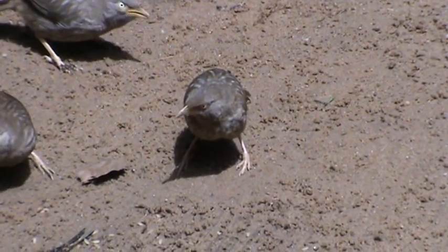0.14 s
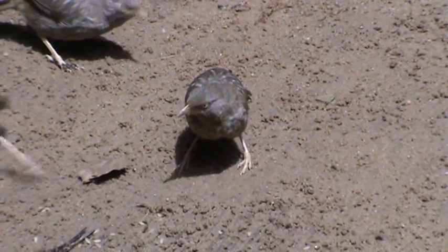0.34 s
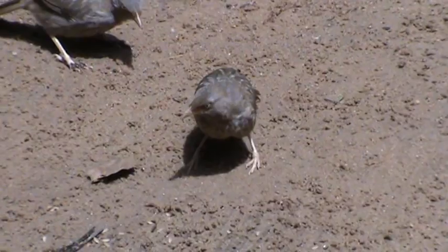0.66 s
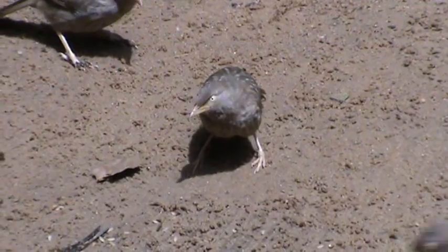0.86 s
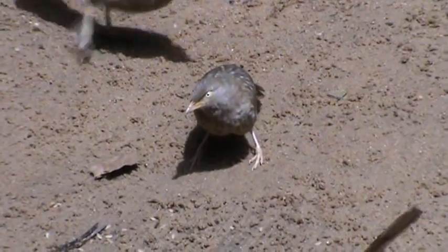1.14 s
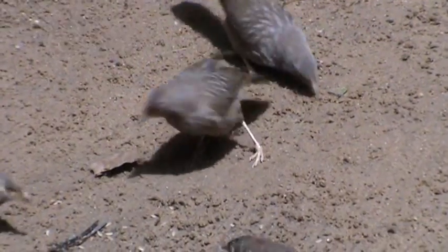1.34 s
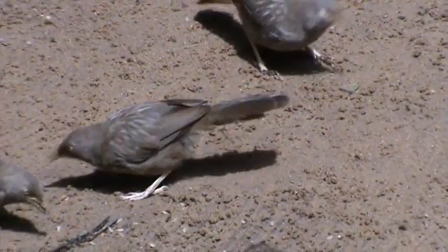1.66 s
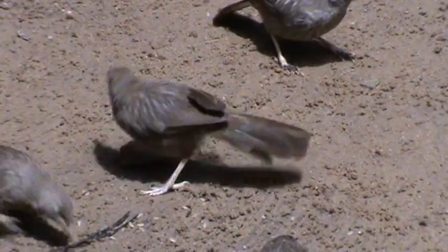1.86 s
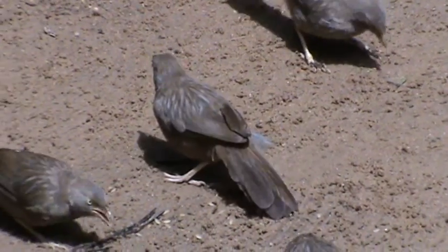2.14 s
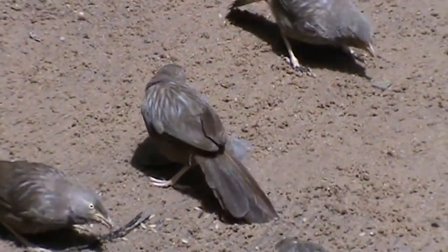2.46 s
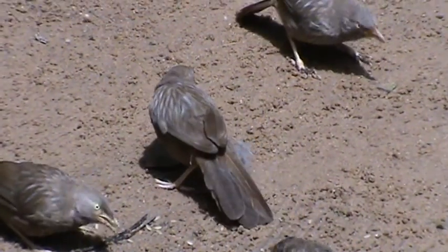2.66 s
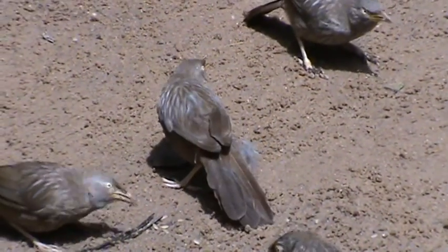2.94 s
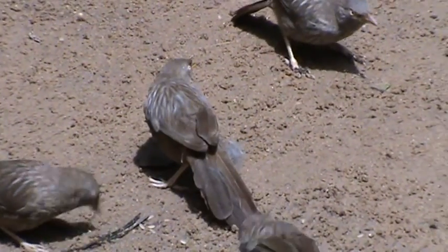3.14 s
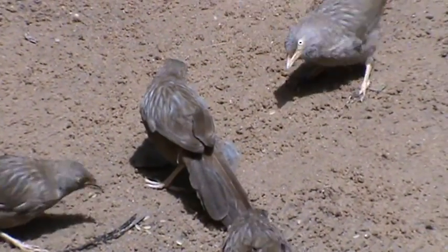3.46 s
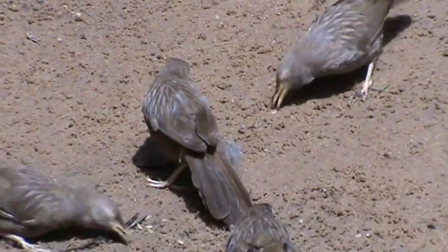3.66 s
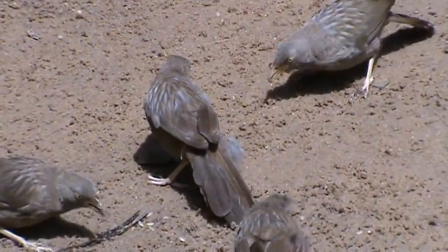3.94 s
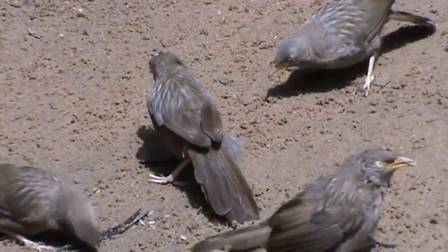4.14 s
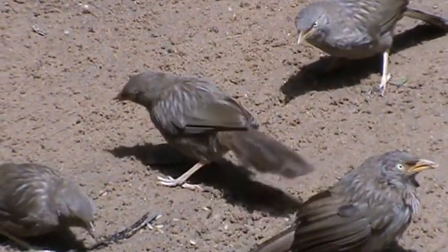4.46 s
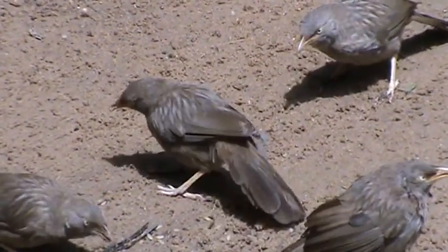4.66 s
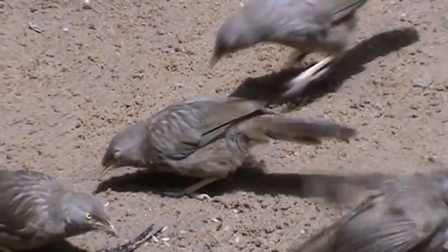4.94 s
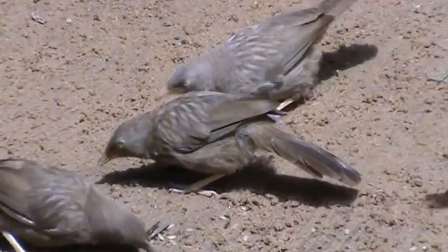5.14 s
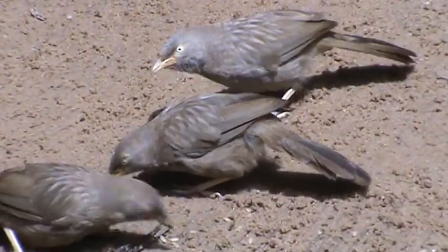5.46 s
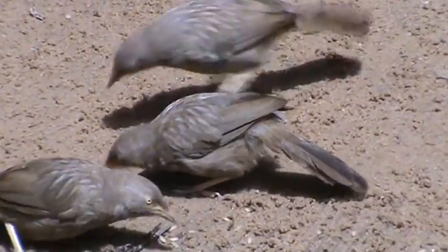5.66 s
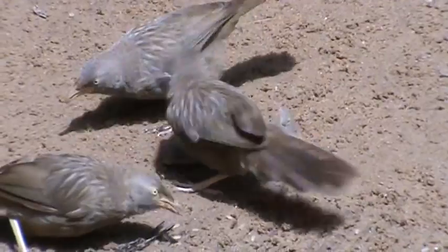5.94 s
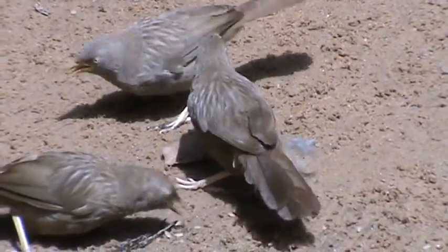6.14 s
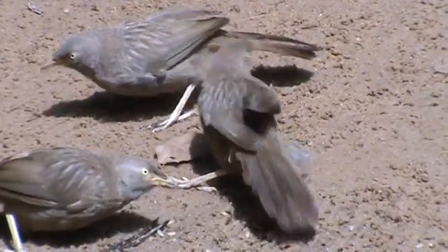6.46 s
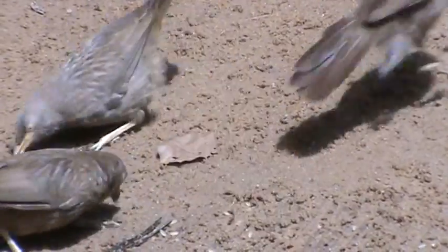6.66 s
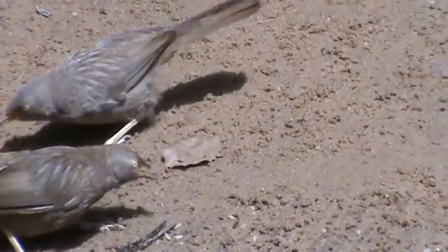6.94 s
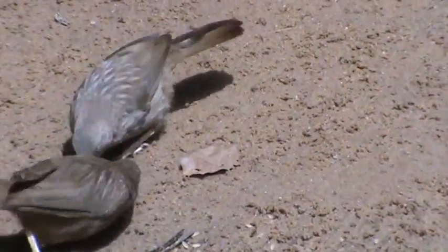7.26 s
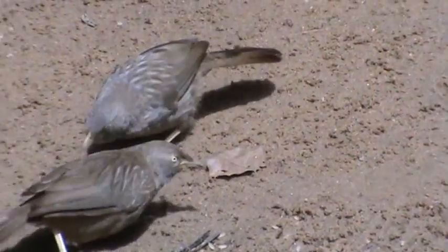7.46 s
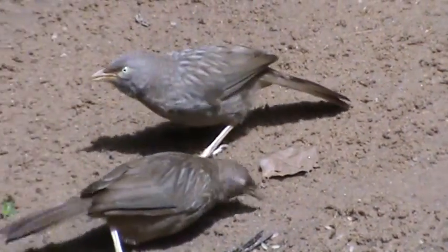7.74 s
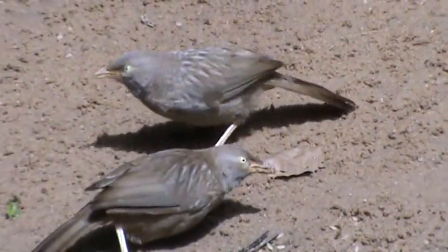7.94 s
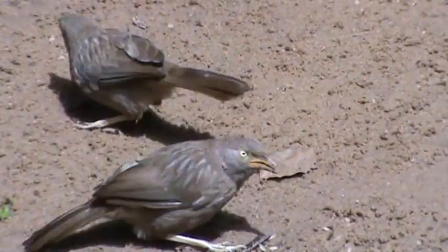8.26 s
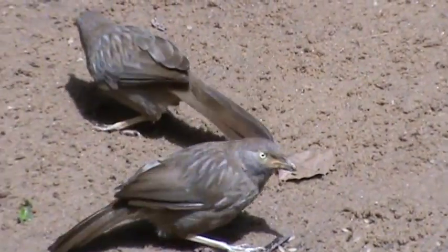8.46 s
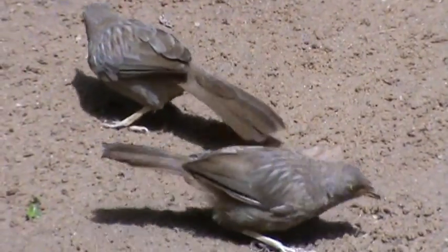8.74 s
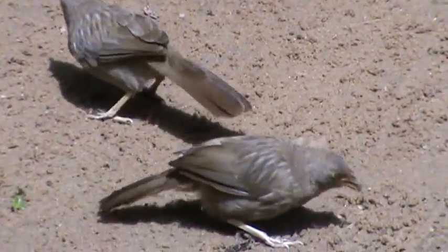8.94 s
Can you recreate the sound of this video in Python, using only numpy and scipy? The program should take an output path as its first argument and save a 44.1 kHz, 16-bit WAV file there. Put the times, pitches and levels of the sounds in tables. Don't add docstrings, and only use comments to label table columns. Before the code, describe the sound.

Outdoors in a bare yard, babblers squabble close to a small stereo microphone. A low, uneven machine hum is strongest at the start and slowly recedes under distant air, hiss and a very faint high electronic whine. From 0 to 1.3 seconds come hoarse rasps, falling squawks and quick chatter, topped by loud shrill squeals around 1 second. A low grumble and chuck at 1.8 lead to yelps and shrieks until 2.7. Faint mutters and rasps follow, building from 3.4. At 4.7 a sharp shriek starts a second quarrel of chatter and arching yelps, peaking in a trembling scream near 5.6 and a long rasp at 5.9. Wings rustle throughout and beaks tick on grit. Grumbles and chucks thin out after 6. From 7.5 a distant songbird whistles four echoing phrases, each ending in a falling sweep. Three rapid hollow knocks near 8.95 precede a final loud rasp.

```python
import sys
import numpy as np
from scipy import signal
from scipy.fft import rfft, irfft, next_fast_len
from scipy.io import wavfile
from scipy.ndimage import uniform_filter1d

SR = 44100
rng = np.random.default_rng(int(sys.argv[2]) if len(sys.argv) > 2 else 0)


def master(y):
    cut = np.clip(np.atleast_2d(y).T, -1, 1)
    pcm = np.round(cut * 32767)
    wavfile.write(sys.argv[1], SR, pcm.astype(np.int16))


def boost(x):
    u = np.asarray(x, float) / 20
    return 10 ** u


N = 401751
T = np.arange(N) / SR
LEAD_S = .005


def curve(points, hz):
    point_hz, value = np.transpose(points)
    return np.interp(np.log(hz + 1), np.log(point_hz), value)


def fades(n, edge_s):
    t = np.arange(n) / SR
    nearest_end_s = np.minimum(t, t[::-1])
    return np.sin(np.pi / 2 * np.clip(nearest_end_s / edge_s, 0, 1)) ** 2


def add(out, x, s, pan_db):
    i = int(s * SR)
    x = x[:N - i]
    out[:, i:i + len(x)] += x * boost(np.array([[pan_db], [-pan_db]]) / 2)


def band(x, lo_hz, hi_hz):
    sos = signal.butter(2, [lo_hz, min(hi_hz, .45 * SR)], "bandpass", fs=SR, output="sos")
    return signal.sosfilt(sos, x)


def walk(rate, n):
    k = max(int(SR / rate), 1)
    levels = rng.standard_normal(n // k + 2)
    joined = np.interp(np.arange(n) / k, np.arange(n // k + 2), levels)
    return uniform_filter1d(joined, k)


def echo(x, t60_s, direct_db, wet_db, damp_hz, gap_s):
    t = np.arange(int(1.2 * SR)) / SR
    shared, left, right = rng.standard_normal((3, len(t)))
    tail = .35 * shared + np.array([left, right])
    tail = tail * boost(-60 * t / t60_s) * np.clip(t / gap_s, 0, 1)
    tail = signal.lfilter(*signal.butter(1, damp_hz, fs=SR), tail)
    tail = tail / np.sqrt(np.sum(tail ** 2, axis=1, keepdims=True))
    wet = signal.fftconvolve(x, tail, axes=1)[:, :N]
    return boost(direct_db) * x + boost(wet_db) * wet


# frequency in Hz, level in dB.
THROAT = [(500, -30), (1000, -17), (1400, -13), (1900, -2), (2400, 0), (3000, -5), (4000, -2), (4800, -6),
          (6000, -14), (8000, -22), (11000, -26), (16000, -38)]


def throat_gain(f, tilt_db, beak):
    peaks_db = sum(db / (1 + ((f - hz) / 400) ** 2) for hz, db in beak)
    slope_db = tilt_db * np.log2(f / 2500)
    return boost(curve(THROAT, f) + slope_db + peaks_db) * (f < 16000)


# start in seconds, end in seconds, beats per second in Hz, depth from 0 to 1.
FLUTTERS = [
    (1.0, 1.06, 170, .35),
    (1.18, 1.24, 150, .45),
    (1.24, 1.32, 150, .25),
    (5.57, 5.64, 230, .3),
    (5.64, 5.84, 250, .5),
]


def flutter(t):
    out = 0
    for start, end, rate, depth in FLUTTERS:
        turns = np.cumsum(rate * (1 + .2 * walk(40, len(t)))) / SR
        out = out + depth * ((t > start) & (t < end)) * np.sin(2 * np.pi * turns)
    return out


def squawk(pitch, effort, hoarse, tilt_db, beak, rasp_db):
    first = int(max(pitch[0][0] - LEAD_S, 0) * SR)
    t = np.arange(first, int((pitch[-1][0] + .01) * SR)) / SR
    hz = np.interp(t, *np.transpose(pitch))
    db = np.interp(t, *np.transpose(effort))
    hz = uniform_filter1d(hz, size=400, mode="nearest")
    wobble = (.005 + .025 * hoarse) * walk(60, len(t))
    cycles = np.cumsum(hz * (1 + wobble)) / SR
    k = np.arange(1, int(16000 / hz.min()) + 1)[:, None]

    per_cycle = rng.standard_normal((len(k), int(cycles[-1]) + 2))
    size = 1.2 * np.array([np.interp(cycles, np.arange(len(c)), c) for c in per_cycle])
    f = k * hz[::16]
    steps = f.shape[1]

    def wide(v):
        return np.repeat(v, 16, axis=1)[:, :len(t)]

    tremble_db = 2.5 * np.array([walk(50 * 16, steps) for _ in k])
    blur = wide(1.5 * np.array([walk(420 * 16, steps) for _ in k]))

    tiring = np.linspace(.45, 1.55, steps)
    share = wide(np.clip(hoarse * tiring * (f / 2500) ** .7, 0, 1))
    grain = min(2 * hoarse, 1)
    rough = np.sqrt(1 - grain) * blur + np.sqrt(grain) * size
    voiced = np.sqrt(1 - share) + np.sqrt(share) * rough
    top = min(4 * hoarse, .9)
    rasp = np.sqrt(1 - top) + np.sqrt(top / 2) * (size + blur)

    slip_s = (6e-6 + 3e-5 * hoarse) * walk(900, len(t))
    second = flutter(t)
    cycles = cycles + hz * slip_s + .08 * second

    gain = throat_gain(f, tilt_db, beak)
    high = np.clip((f - 4900) / 1100, 0, 1) ** 2

    def steady(g):
        return wide(g * boost(tremble_db) / np.sqrt(np.sum(g ** 2, axis=0) / 2))

    low_part = steady(gain * (1 - high))
    high_part = steady(gain * (high + 1e-6))
    partials = voiced * low_part + boost(rasp_db) * rasp * high_part
    tone = np.sum(partials * np.cos(k * 2 * np.pi * cycles + k ** 2), axis=0)
    return boost(db - 2.5) * (1 + second) * tone * fades(len(t), .017)


def effort_of(s, length, db, attack_s, swell_db, release_s):
    end_db = db + swell_db / 2
    return [(s, db - 9), (s + attack_s, db - swell_db / 2),
            (s + length - release_s, end_db), (s + length, end_db - 3.5)]


def contour(s, length, db, first_hz, last_hz, bend, scoop, **level):
    t = np.arange(0, length, .004)
    glide_hz = first_hz + (last_hz - first_hz) * (t / length) ** bend
    hz = glide_hz * (1 - scoop * np.exp(-t / .0153))
    return np.transpose([s + t, hz]), effort_of(s, length, db, **level)


# start in seconds, length in seconds, level in dB, first pitch in Hz, last pitch in Hz.
SQUEALS = [
    (.956, .085, -29.5, 2274, 1987),
    (6.175, 0.088, -49.5, 2454, 2510),
]
MUTTERS = [
    (2.935, 0.12, -60, 558, 545),
    (4.285, 0.11, -42.5, 579, 580.5),
    (7.27, 0.21, -45, 457, 462.3),
]
GRUMBLES = [
    (1.762, 0.145, -42.5, 389.4, 417.4),
    (4.487, 0.11, -41.5, 557, 575),
]
CHUCKS = [
    (1.96, 0.099, -37.5, 1255, 1055),
    (6.48, .095, -35, 1243, 1157),
]
RASPS = [
    (0.0, 0.11, -46, 879, 910),
    (.303, 0.088, -38.5, 740, 674),
    (5.86, 0.22, -37.5, 793.6, 769),
    (6.86, .25, -47, 542, 557),
    (7.27, 0.24, -48.5, 786, 801),
    (7.82, 0.2, -46.5, 1081, 951),
]
# (time in seconds, pitch in Hz).
QUARREL = [("slide", -33.5, 4.8, [(3000, 12.5), (4100, 4.9)], [(.1, 1124), (.12, 1051), (.2, 988),
           (.235, 882), (.285, 748)]), ("slide", -34, 0, [(2600, 8), (3600, 9.4), (2000, -3)],
           [(.392, 1142), (.41, 1051), (.435, 903), (.47, 820)]), ("chatter", -33, 1, [(3300, 7.5),
           (3900, 12), (2600, -1)], [(.47, 662), (.51, 634.5), (.56, 652), (.635, 619)]),
           ("whine", -37, -5, [(4700, 21), (5250, 23)], [(.675, 521), (.77, 520)]),
           ("rasp", -35, 0, [(2000, 2.2), (6500, 3.3)], [(.66, 638), (.77, 653.5)]),
           ("chatter", -32.5, 1, [(3250, 8.5), (3850, 10.8)], [(.762, 751), (.79, 670), (.825, 626),
           (.87, 654.5), (.92, 621.6), (.955, 666)]), ("squeal", -33, -5.5, [(2250, 1.5), (4300, 5),
           (5000, -7)], [(1.13, 2186), (1.165, 2296), (1.2, 2180), (1.24, 2146), (1.27, 1930),
           (1.308, 1563)]), ("shriek", -38, 1, [(4800, 12), (3400, 4.8), (6800, 8)], [(2.05, 675),
           (2.13, 678)]), ("yelp", -38, 0, [(3600, 3), (4700, 4.4), (6000, 9.6)], [(2.12, 1513),
           (2.14, 1952), (2.165, 1987), (2.195, 1743), (2.225, 1226)]),
           ("shriek", -35.5, -0.52, [(2460, 5.1), (4530, 14.5), (3400, -1)], [(2.336, 1261),
           (2.37, 1154), (2.4, 949), (2.45, 768), (2.505, 681)]), ("shriek", -39, 0, [(2400, 3.5),
           (4620, 6), (3500, 0)], [(2.576, 810), (2.613, 806), (2.64, 663), (2.67, 638)]),
           ("mutter", -39, -3, [(2450, 9.8), (4500, 11)], [(2.645, 859), (2.68, 810), (2.725, 739)]),
           ("rasp", -45.5, -4, [(1850, 8.7), (4200, 6)], [(3.425, 612), (3.545, 608)]),
    ("rasp", -43, 1.8, [(2300, 5.6), (5000, 5.6)], [(3.55, 572.4), (3.65, 585), (3.76, 575)]),
    ("rasp", -36, 0, [(1950, 3.4), (5700, 8.2)], [(9.012, 956), (9.11, 1006)]),
    ("whine", -42.5, 3.6, [(2100, 4), (4400, 13)], [(3.828, 1558), (3.86, 1450), (3.89, 1146), (3.92, 872), (3.945, 728)]),
    ("mutter", -40.5, 0, [(2250, 3.5), (1430, 4.2)], [(4.02, 729), (4.07, 720), (4.1, 641), (4.13, 636)]),
    ("chatter", -35.5, -2.8, [(2350, 10.5), (3600, 11)], [(4.125, 590), (4.18, 586)]),
           ("shriek", -29.5, -6.5, [(3200, 4.1), (4800, 8.5)], [(4.682, 1690), (4.695, 1560), (4.722, 1450)]),
    ("slide", -39, -2, [(2400, 6), (3200, 3)], [(4.712, 1262), (4.735, 1102), (4.762, 803)]),
    ("chatter", -35.5, 2.7, [(2500, 4.4), (3800, 9.2), (4500, 7.9)], [(4.752, 806), (4.778, 675), (4.8, 609), (4.835, 632), (4.885, 612)]),
    ("yelp", -35, 0, [(3800, 9.5), (2500, 7.7), (4870, -5)], [(4.878, 1634), (4.915, 2018), (4.95, 1917), (4.985, 1706), (5.012, 1200)]),
    ("chatter", -35, 0.5, [(2350, 3.9), (3500, 8)], [(5.13, 884), (5.146, 795), (5.165, 716), (5.2, 638)]),
    ("chatter", -33.5, 0.9, [(3300, 8.4), (2590, 2.1)], [(5.203, 661), (5.22, 681), (5.255, 651), (5.305, 641)]),
    ("yelp", -32.5, -3.5, [(3900, 7.5), (2000, 2), (5170, -6)], [(5.298, 1772), (5.325, 2160), (5.355, 1993), (5.38, 1798), (5.402, 1374)]),
    ("grumble", -39, 8.2, [(2900, 9), (5500, 4)], [(6.25, 434.4), (6.35, 447.7), (6.42, 453)]),
    ("chuck", -37.5, -2.4, [(3400, 10), (6400, 4.6)], [(6.655, 900), (6.69, 860), (6.735, 836)]),
]
# time in seconds, pitch in Hz.
SCREAM_HZ = [(5.524, 1955), (5.599, 1870), (5.625, 1895), (5.651, 1970.5), (5.721, 1910.5), (5.801, 1534),
             (5.812, 1329), (5.827, 1105)]
# time in seconds, level in dB.
SCREAM_DB = [(5.525, -34), (5.562, -31), (5.62, -34), (5.665, -27), (5.74, -31), (5.8, -31), (5.826, -29.5)]
# resonance in Hz, strength in dB.
SCREAM_BEAK = [(3850, 6.5), (4750, -7), (7000, 8)]
VOICE = {"squeal": dict(pan_db=0.3, beak_hz=4500, beak_db=1.5, tilt_db=-1.5, rasp_db=-20),
         "yelp": dict(pan_db=-1.5, beak_hz=3800, beak_db=4.5, tilt_db=-0.2, rasp_db=-17.5),
         "slide": dict(pan_db=-3, beak_hz=3070, beak_db=10, tilt_db=-4, rasp_db=-15),
         "chatter": dict(pan_db=-2, beak_hz=3570, beak_db=9, tilt_db=-4.1, rasp_db=-16.5),
         "mutter": dict(pan_db=-1, beak_hz=2100, beak_db=10, tilt_db=-6, rasp_db=-14),
         "shriek": dict(pan_db=-1.5, beak_hz=4830, beak_db=12, tilt_db=-4.5, rasp_db=-10.5),
         "grumble": dict(pan_db=4, beak_hz=3080, beak_db=3, tilt_db=-7, rasp_db=-17),
         "whine": dict(pan_db=-2, beak_hz=1450, beak_db=0, tilt_db=-10, rasp_db=-12),
         "chuck": dict(pan_db=4.5, beak_hz=3300, beak_db=5, tilt_db=-7.5, rasp_db=-17.5),
         "rasp": dict(pan_db=1.2, beak_hz=2100, beak_db=0, tilt_db=-3, rasp_db=-10.5),
         "scream": dict(pan_db=-3, beak_hz=3850, beak_db=5, tilt_db=0.5, rasp_db=-18)}
HOARSENESS = dict(squeal=.12, yelp=.25, slide=.36, whine=.24, chatter=.25, mutter=.38, shriek=.3, grumble=.47, chuck=.4, rasp=.8, scream=.09)
SHAPE = {"squeal": dict(bend=2.9, scoop=0.055, attack_s=0.0033, swell_db=0, release_s=0.025),
         "yelp": dict(bend=1.9, scoop=.2, attack_s=.018, swell_db=1.5, release_s=.02),
         "slide": dict(bend=1.7, scoop=0.0092, attack_s=0.0046, swell_db=6, release_s=0.0067),
         "chatter": dict(bend=0.336, scoop=0.013, attack_s=0.013, swell_db=0.7, release_s=0.013),
         "mutter": dict(bend=1, scoop=0.0028, attack_s=0.027, swell_db=-1.5, release_s=0.01),
         "shriek": dict(bend=0.96, scoop=0.012, attack_s=0.0094, swell_db=0.5, release_s=0.039),
         "grumble": dict(bend=1.066, scoop=0.015, attack_s=0.003, swell_db=6, release_s=0.042),
         "whine": dict(bend=1.3, scoop=0.0093, attack_s=0.0069, swell_db=5, release_s=0.022),
         "chuck": dict(bend=1.17, scoop=0.0089, attack_s=0.017, swell_db=-1, release_s=0.02),
         "rasp": dict(bend=1.6, scoop=0.0079, attack_s=0.028, swell_db=-6.5, release_s=0.035)}


def flock():
    out = np.zeros((2, N))
    notes = []
    kinds = dict(squeal=SQUEALS, mutter=MUTTERS, grumble=GRUMBLES, chuck=CHUCKS, rasp=RASPS)
    for kind, rows in kinds.items():
        for row in rows:
            pitch, effort = contour(*row, **SHAPE[kind])
            notes.append((kind, None, pitch, effort))
    for kind, db, swell_db, beak, pitch in QUARREL:
        start, end = pitch[0][0], pitch[-1][0]
        shape = SHAPE[kind]
        effort = effort_of(start, end - start, db, shape["attack_s"], swell_db, shape["release_s"])
        notes.append((kind, beak, pitch, effort))
    notes.append(("scream", SCREAM_BEAK, SCREAM_HZ, SCREAM_DB))

    for kind, beak, pitch, effort in notes:
        voice = VOICE[kind]
        if beak is None:
            hz, db = voice["beak_hz"], voice["beak_db"]
            beak = [(hz, db), (1.9 * hz, .6 * db)]
        note = squawk(pitch, effort, HOARSENESS[kind], voice["tilt_db"], beak, voice["rasp_db"])
        add(out, note, max(pitch[0][0] - LEAD_S, 0), voice["pan_db"])
    return out


# start in seconds,
# length in seconds, middle frequency in Hz, level in dB.
RUSTLES = [(0.0, .04, 2900, -37), (.5, .2, 1500, -48), (.67, .12, 9000, -51), (.798, .21, 810, -41.5),
           (1.0, .16, 5500, -49), (1.0, .16, 3000, -47), (1.24, .3, 6000, -53), (1.97, .1, 2500, -45),
           (2.22, .14, 5000, -49), (2.22, .14, 2300, -48), (2.48, .13, 5500, -53), (2.02, .26, 9260, -51),
           (2.17, .12, 4700, -43), (2.34, .17, 4400, -43), (2.6, .14, 6460, -51), (3.15, .17, 4200, -53),
           (3.425, .07, 4300, -50), (3.43, .08, 860, -43), (3.614, .12, 6000, -49), (4.04, .1, 3500, -48),
           (4.29, .12, 3300, -49), (4.53, .07, 2500, -46), (4.679, .096, 900, -38.5),
           (4.68, .055, 5000, -39), (4.78, .12, 5170, -43), (4.85, .05, 2700, -42), (4.95, .1, 3800, -44),
           (5.0, .11, 4000, -51.5), (5.2, .11, 5200, -41), (5.18, .14, 10000, -52), (5.37, .13, 3900, -43),
           (5.75, .12, 9500, -51), (5.85, .17, 940, -40), (5.86, .12, 5500, -45), (5.95, .14, 5500, -50),
           (.26, .14, 6000, -52), (.6, .09, 5500, -50), (6.06, .2, 1950, -49.5), (6.279, .19, 806, -47.5),
           (6.365, .055, 3000, -42), (6.53, .06, 2200, -45), (6.67, .08, 2200, -45),
           (6.55, .2, 4900, -48.5), (7.082, .19, 1800, -61), (7.457, .18, 2400, -47),
           (7.81, .12, 2100, -48), (7.87, .12, 9000, -63), (8.502, .064, 9000, -55),
           (9.007, .08, 6000, -50)]


def rustles():
    out = np.zeros((2, N))
    for s, length, hz, db in RUSTLES:
        n = int(length * SR)
        grains = rng.standard_normal(n) * boost(2 * walk(144, n))
        brush = band(grains, 0.67 * hz, 1.22 * hz) * np.hanning(n)
        add(out, boost(db + 8.5) * brush, s, .8)
    return out


# time in seconds, nearness in dB.
MACHINE_DB = [(0.0, 10.5), (1.6, 4.5), (3.6, 2), (5.0, 2), (9.11, -4)]
# frequency in Hz, level in dB.
HUM = [(48.4, -51.5), (70.0, -65), (134.6, -68), (199.2, -63.5)]


def hum():
    near_db = np.interp(T, *np.transpose(MACHINE_DB))
    out = 0
    for hz, db in HUM:
        share = .33 if hz < 60 else 1
        phase = 2 * np.pi * np.cumsum(hz * (1 + 0.0454 * walk(hz / 8, N))) / SR
        level_db = db + share * near_db + (hz - 30) / 35 * walk(hz / 7, N)
        out = out + np.sqrt(2) * boost(level_db) * np.sin(phase)
    return out


# frequency in Hz, level in dB per Hz.
AIR = [(35, -12), (60, -3), (107, -8), (211, -11.5), (369, -15), (646, -15), (726, -15.5), (938, -16),
       (2070, -17.5), (2440, -19), (3880, -22.5), (15700, -35)]
# frequency in Hz, left-right likeness from 0 to 1.
LIKENESS = [(60, .9997), (130, .99), (300, .88), (700, .6), (3000, .35), (8000, .35), (12000, .8)]


def air():
    size = next_fast_len(N)
    hz = np.fft.rfftfreq(size, 1 / SR)
    like = curve(LIKENESS, hz)
    mid, side = rfft(rng.standard_normal((2, size))) * boost(curve(AIR, hz))
    mid = mid * np.sqrt(1 + like)
    side = side * np.sqrt(1 - like)
    scale = np.sqrt(np.mean(irfft(mid * (hz > 300), size) ** 2))
    both = np.array([mid + side, mid - side])
    bass = 1 / (1 + (hz / 350) ** 2)
    rumble = irfft(bass * both, size)[:, :N]
    hiss = irfft((1 - bass) * both, size)[:, :N]
    fade_db = 0.49 * np.interp(T, *np.transpose(MACHINE_DB))
    gust_db = .7 * walk(1.5, N)
    return boost(-53) * (boost(fade_db) * rumble + boost(gust_db) * hiss) / scale


def electronic_whine():
    return boost(-77) * np.sin(2 * np.pi * 15625 * T)


# time in seconds, peak level in dB, ringing frequency in Hz.
TICKS = [(1.9382, -34, 7280), (2.9544, -38, 4130), (4.098, -30, 6000), (7.121, -39, 3500),
         (7.362, -46, 5000), (4.6844, -50, 4840), (8.0481, -39, 4320), (8.5494, -49, 5500),
         (8.6681, -35, 4320)]


def beak_taps():
    out = np.zeros((2, N))
    t = np.arange(2000) / SR
    for s, db, hz in TICKS:
        burst = rng.standard_normal(len(t)) * np.exp(-t / 0.00075)
        add(out, boost(db) * band(burst, .5 * hz, 2.0 * hz), s, 1.5)
    return out


# start in seconds after the phrase's time, length in seconds,
# first pitch in Hz, last pitch in Hz, level in dB.
PHRASE = [
    (-.072, 0.0403, 2344, 2038, -50.5),
    (-.034, 0.0347, 2100, 2630, -51.5),
    (-.004, 0.033, 3090, 3032, -42),
    (0.104, .028, 5404, 5490, -46.5),
    (0.133, .068, 5400, 3173, -40),
]
# time in seconds, added level in dB.
PHRASES = [
    (7.575, -3.5),
    (8.0, -0.7),
    (8.388, -1),
    (8.805, -1.2),
]
# start in seconds, length in seconds, first pitch in Hz, last pitch in Hz, level in dB.
WHISTLES = [
    (7.455, 0.055, 2720, 2690, -53),
]


def songbird():
    out = np.zeros((2, N))
    song = [(s + after, length, start_hz, end_hz, db + more_db)
            for s, more_db in PHRASES
            for after, length, start_hz, end_hz, db in PHRASE]
    for s, length, start_hz, end_hz, db in song + WHISTLES:
        n = int(length * SR)
        scooped = 2800 < start_hz < 3200
        scoop = 0.137 * np.exp(-np.arange(n) / SR / 0.00645) * scooped
        hz = np.geomspace(start_hz, end_hz, n) * (1 - scoop + 0.0088 * walk(99, n))
        whistle = np.sin(2 * np.pi * np.cumsum(hz) / SR) * fades(n, 0.0073)
        add(out, boost(db + 0.43 * walk(78, n)) * whistle, s, 4.5)
    return out


# time in seconds, level in dB, ringing frequency in Hz.
KNOCKS = [
    (8.947, -44, 466),
    (8.974, -40.5, 472),
    (8.992, -38, 507),
]


def knocks():
    out = np.zeros((2, N))
    t = np.arange(2000) / SR
    for s, db, hz in KNOCKS:
        ring = np.sin(2 * np.pi * hz * t) * np.exp(-t / 0.01)
        crack = 4.2 * band(rng.standard_normal(len(t)) * np.exp(-t / 0.0088), 470, 1800)
        add(out, boost(db - 2) * (ring + crack), s, .8)
    return out


def scene():
    close = flock() + rustles() + beak_taps() + knocks()
    near = echo(close, t60_s=.43, direct_db=0, wet_db=-6, damp_hz=10000, gap_s=.004)
    far = echo(songbird(), t60_s=0.74, direct_db=-4.5, wet_db=2.5, damp_hz=6000, gap_s=0.0029)
    return near + far + hum() + air() + electronic_whine()


def top_cut(x):
    return signal.sosfilt(signal.butter(12, 15860, fs=SR, output="sos"), x)


def record(dry):
    return top_cut(dry)


dry = scene()
out = record(dry)
master(out)
```